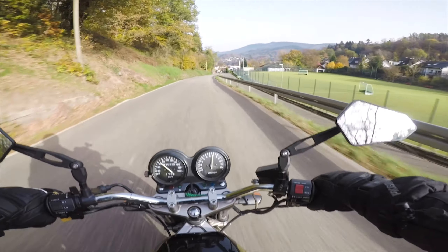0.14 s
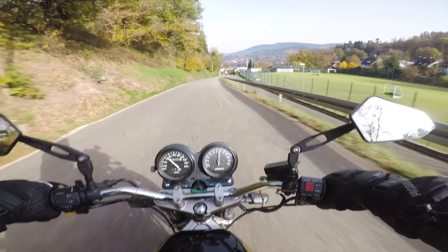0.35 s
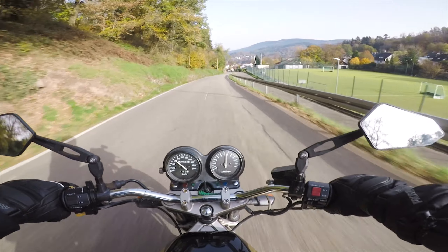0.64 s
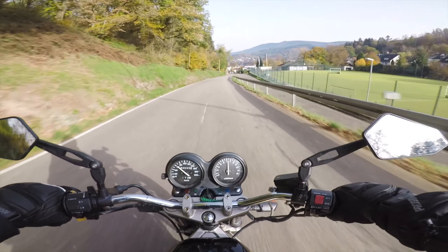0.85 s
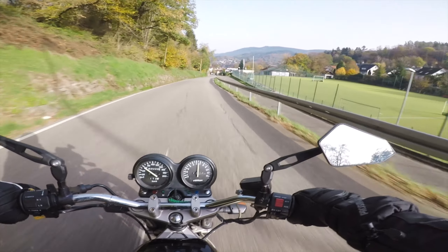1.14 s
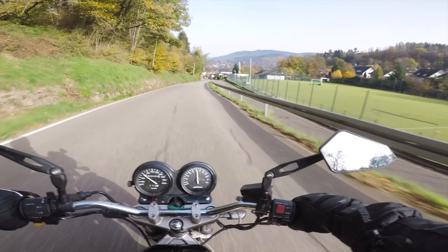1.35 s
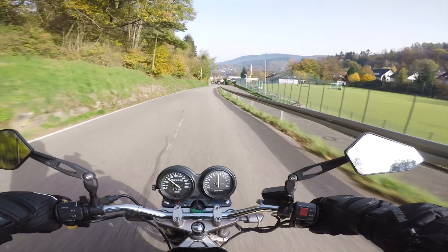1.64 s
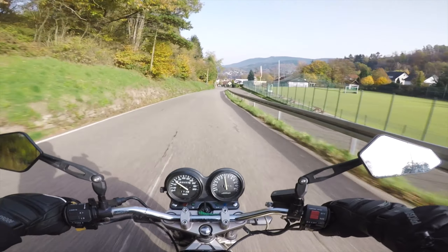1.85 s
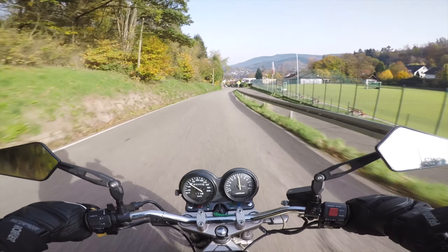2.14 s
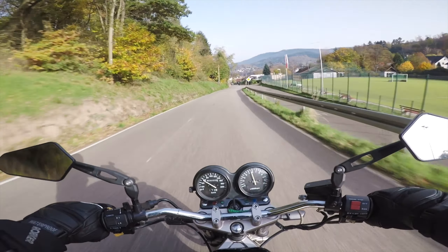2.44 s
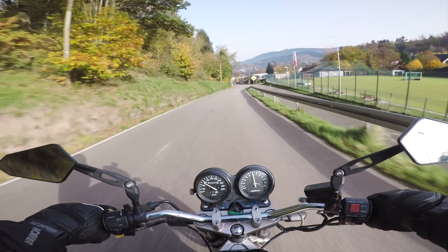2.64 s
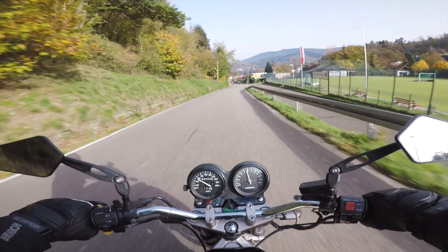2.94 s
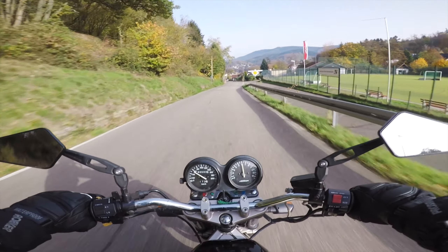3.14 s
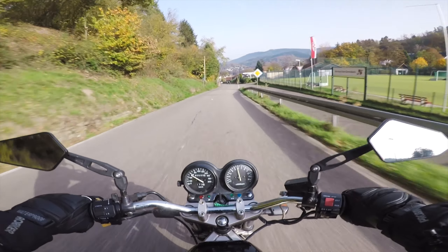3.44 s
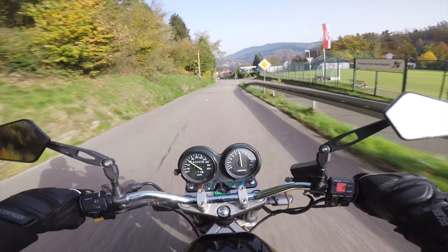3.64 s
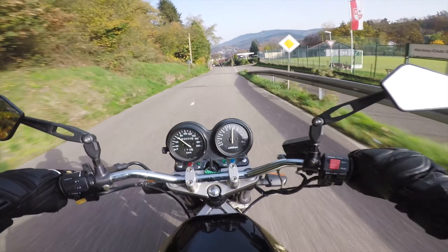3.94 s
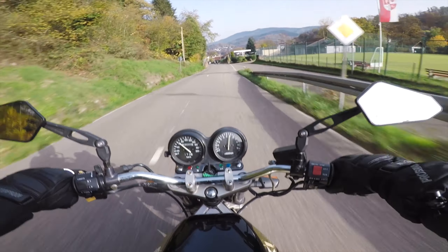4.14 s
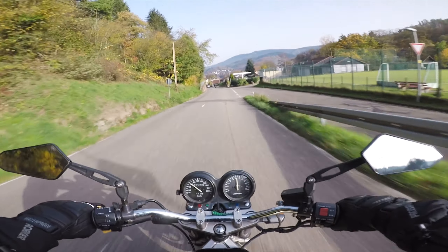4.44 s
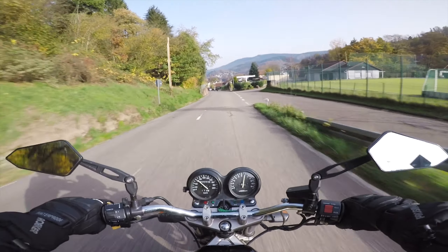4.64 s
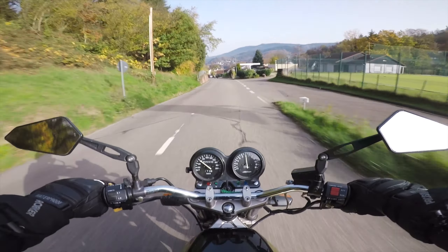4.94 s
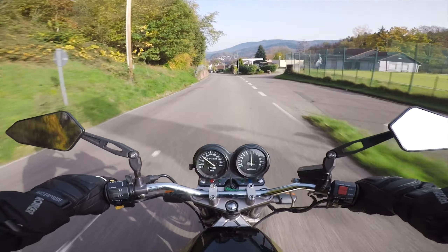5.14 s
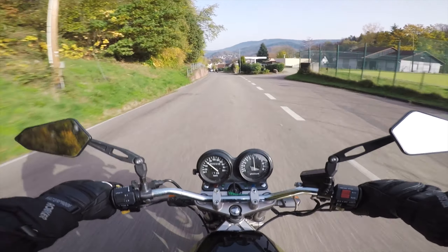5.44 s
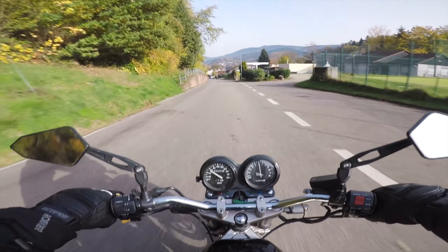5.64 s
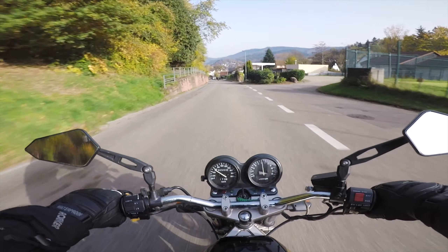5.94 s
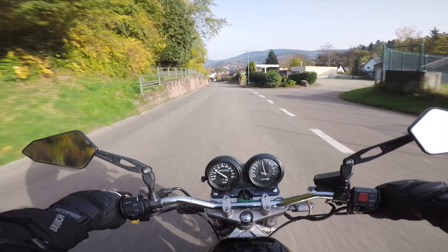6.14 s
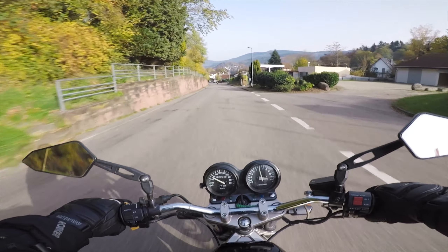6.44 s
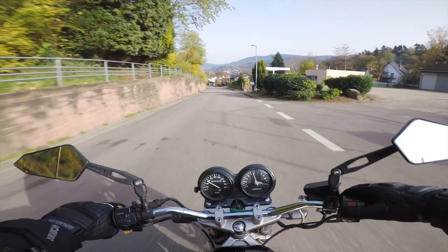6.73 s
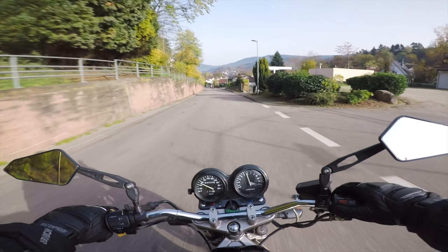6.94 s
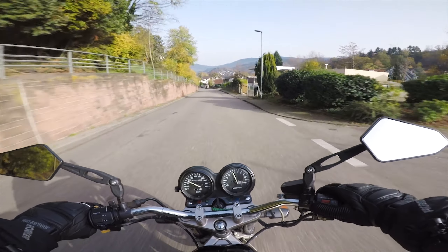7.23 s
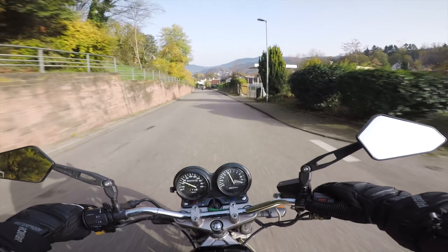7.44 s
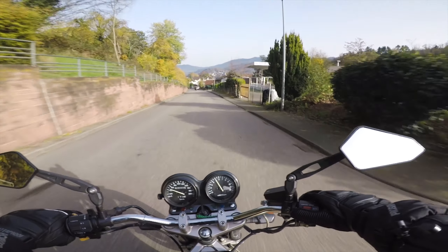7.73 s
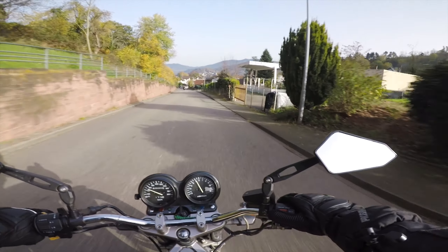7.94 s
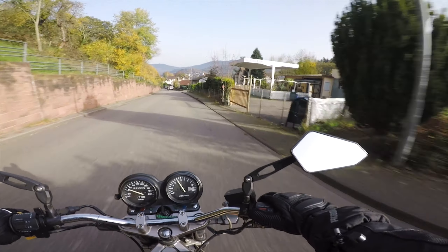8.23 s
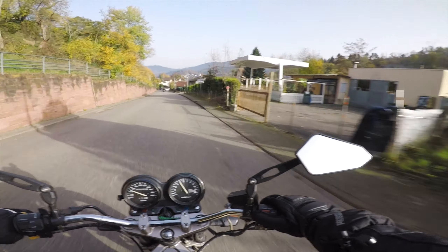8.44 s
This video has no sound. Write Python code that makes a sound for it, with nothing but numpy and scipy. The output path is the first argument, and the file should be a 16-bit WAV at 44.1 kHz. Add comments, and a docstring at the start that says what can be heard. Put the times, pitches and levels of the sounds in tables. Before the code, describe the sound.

Wind buffets a microphone at the rider's helmet as a twin-cylinder motorcycle slows on an open road. The exhaust booms and burbles, with scattered pops over light mechanical ticking and a thin whine. Midway, one short pull on the throttle raises the pitch and hardens the note into a bark. Then the engine sinks to a lower drone, with some soft thuds, and the wind eases slightly.

```python
"""Parallel-twin motorcycle exhaust, heard from the rider's helmet.
On the overrun, engine orders boom in the silencer, gas burbles and unburnt fuel pops.
The throttle opens once, the firings bark, then the engine slows again.
Valves clatter in step with the crank; upper orders whine through a resonance.
Wind rumbles and hisses round the helmet; a brake rubs faintly at the end."""
import sys
import numpy as np
from scipy import signal
from scipy.fft import rfft, irfft, next_fast_len
from scipy.io import wavfile
from scipy.ndimage import uniform_filter1d, minimum_filter1d, map_coordinates

SR = 44100
rng = np.random.default_rng(int(sys.argv[2]) if len(sys.argv) > 2 else 0)


def bounce(signal):
    """Save signal as a 16-bit WAV file at the path given by the first command-line argument."""
    frames = np.transpose(np.atleast_2d(signal))
    limited = np.clip(frames, -1, 1)
    pcm = np.round(limited * 32767).astype(np.int16)
    wavfile.write(sys.argv[1], SR, pcm)


N = 377937
CRUISE_HZ = 46  # reference cycle rate

# Four-stroke cycle rate: t/s, f/Hz
CYCLE_RATE = [(0, 53.22), (.25, 52.4), (.7, 50.3), (1.1, 49.82), (1.5, 47.88), (2.2, 45.76), (2.97, 44.03),
              (3.14, 47.8), (3.22, 45.15), (3.6, 47.03), (3.8, 50.87), (4.13, 52.76), (4.26, 48.3),
              (4.39, 50.45), (4.95, 48.7), (6.4, 44.23), (7.7, 40.67), (8.57, 38.67)]
# Throttle: t/s, opening/0-1
THROTTLE_OPENING = [(2.95, 0.02), (3.15, 0.25), (3.24, .1), (3.5, 0.36), (3.64, 0.44), (3.78, .95),
                    (3.97, 0.94), (4.13, 0.42), (4.17, 0.02)]
# Silencer boom by cycle rate: f/Hz, order 3 level/dB, order 4 level/dB, order 5 level/dB
SILENCER_BOOM = [(38.6, -8, -12, -28.5), (41.6, -14.5, -13.5, -29), (44, -14, -13.5, -24.5),
                 (47.55, -14, -11, -19), (49.5, -15, -13, -16), (51.4, -15, -22, -15),
                 (53.4, -20.5, -32.5, -14.5)]
# Other exhaust orders, throttle shut: f/Hz, level/dB
OVERRUN_HUM = [(38, -40.5), (49, -24), (78, -25.5), (100, -19.5), (235, -35.5), (278, -23), (310, -29),
               (350, -31), (400, -40.5), (520, -46.5), (600, -44), (665, -42.5), (740, -48.5), (850, -56)]
# Drone change with throttle open: f/Hz, gain/dB
PULL_EQ = [(50, 5.5), (92, -8.5), (137, -7), (180, -0.5), (195, 0), (228, -9.5), (275, -4.5), (320, 4.5),
           (370, -3.5), (460, 2.5), (520, 5), (730, 0.5)]
# One firing under load: f/Hz, level/dB
FIRING_SPECTRUM = [(30, -30), (50, -37), (110, -17.5), (205, 9), (260, 3), (310, -3), (360, 4), (420, 7),
                   (540, -5.5), (690, -4), (850, -12.5), (1020, -20), (1140, -14), (1300, -23),
                   (2000, -42.5), (3500, -56), (8000, -93.5)]
# Blow-down gas: f/Hz, level/dB
BLOW_DOWN_SPECTRUM = [(200, -14), (600, 2), (1300, -11), (2800, -17), (6000, -29.5), (10000, -54.5)]
# Exhaust gas, throttle shut: f/Hz, level/dB
BURBLE_SPECTRUM = [(40, -14.5), (85, 7), (170, 3.5), (300, -2), (480, -8), (700, -11.5), (950, -23),
                   (1800, -28.5), (4000, -65.5)]
# Afterfire pops: t/s, strength/dB
AFTERFIRE_POPS = [(0.254, -41), (0.563, -19), (0.607, -12), (0.785, -12.5), (0.821, -33), (0.982, -20.5),
                  (1.006, -32.5), (1.148, -7.5), (1.288, -36), (1.793, -17), (2.159, -18.5), (2.356, -18),
                  (2.484, -26.5), (2.668, -12.5), (2.685, -34), (2.799, -34.5), (2.915, -40), (4.155, -36),
                  (6.238, -47.5), (6.440, -25.5), (6.974, -28), (7.208, -33.5), (7.451, -25), (7.791, -42),
                  (8.174, -40.5), (8.324, -39), (8.507, -28)]
# Silencer resonances: f/Hz, width/Hz, level/dB
SILENCER_MODES = [(117, 29, 1), (282, 64, 1.5), (366, 86, -3.5), (646, 160, -11)]
# Crack of a pop: f/Hz, level/dB
CRACK_SPECTRUM = [(150, -18), (450, -6), (900, -0.5), (1500, 1.5), (3000, -9), (4200, -36.5), (9000, -49)]
# Valve contacts: phase/cycles, strength/ratio
VALVE_CONTACTS = [(0.122, 0.63), (.31, 0.83), (0.457, .6), (0.661, 0.52), (0.907, 0.66)]
# Pipe standing waves: f/Hz, width/Hz, level/dB
PIPE_MODES = [(740, 54, -3.5), (1113, 110, 4.5), (1380, 150, -2), (1700, 74, 0), (2322, 200, -6),
              (2870, 640, -10.5)]
# Orders driving the whine: f/cycle rate, level/dB
WHINE_DRIVE = [(11, -3), (12, 0)]
# Whine harmonics: f/fundamental, level/dB
WHINE_HARMONICS = [(1, 1), (2, -24.5), (3, -18.5), (4, -22.5), (5, -34)]
# Wind buffeting: f/Hz, level/dB
RUMBLE_SPECTRUM = [(15, -18.5), (35, -4), (60, 4.5), (120, -6), (300, -6), (480, -11), (700, -16),
                   (950, -22.5), (2000, -27), (4000, -69.5)]
# Air past the helmet's edges: f/Hz, level/dB
HISS_SPECTRUM = [(1000, -19.5), (2600, -2), (3400, -3), (4000, 1), (4700, 3.5), (5600, -4), (7000, -15),
                 (10000, -52)]
# Finest wind hiss: f/Hz, level/dB
FIZZ_SPECTRUM = [(4000, -22.5), (5600, -2.5), (6350, 0), (7000, -4), (8200, -9), (9300, -17.5),
                 (10500, -38.5), (12000, -70), (13000, -90)]
# Finest wind hiss over time: t/s, level/dB
FIZZ_ENVELOPE = [(0, -59.5), (2.5, -58), (3.6, -55), (4.0, -62.5), (4.6, -59.5), (6.0, -60), (6.45, -68),
                 (6.85, -59), (8.57, -61)]


def drone(cycle_hz, cycles, throttle, lag_rad=.51, smear_rad=.8, bright_db_per_hz=1.03):
    """Low engine orders: 3-5 boom in the silencer, the rest hum through the pipe."""
    rates_hz, *boom_columns = np.transpose(SILENCER_BOOM)
    boom_db = {k: np.interp(cycle_hz, rates_hz, db) for k, db in enumerate(boom_columns, 3)}
    pull = np.tanh(10 * throttle)

    def order(k):
        hz = k * cycle_hz
        if k in boom_db:
            db = boom_db[k] + .87 * wobble(12)
        else:  # faster running sharpens the puffs
            lift_db = bright_db_per_hz * (cycle_hz - CRUISE_HZ) * np.clip(np.log(hz / 260), 0, .4)
            db = along(OVERRUN_HUM, hz) + lift_db + 1.23 * wobble(9.3)
        # the pipe smears each puff over the cycle
        phase_rad = 2 * np.pi * k * cycles - lag_rad + smear_rad * (k - 4) ** 2
        return amp(db + pull * along(PULL_EQ, hz)) * np.cos(phase_rad)

    return order(1) + (1 - throttle ** 3) * sum(order(k) for k in range(2, 17))


def bark(cycles, throttle, firing_db=-16.5, gas_db=-38, far_gain=.43, far_cutoff_hz=900):
    """Under load: two firings about a quarter cycle apart, the far one duller, plus blow-down hiss."""
    near = each_cycle(cycles, 0, scatter_db=.4, jitter_s=2e-5)
    far = each_cycle(cycles, .228, scatter_db=.7, jitter_s=5e-5)
    firings = near + far_gain * filtered(far, lambda hz: 1 / (1 + (hz / far_cutoff_hz) ** 2))
    gate = np.exp(-(cycles % 1) / .46)
    gas = unit(coloured(gate * rng.standard_normal(N), BLOW_DOWN_SPECTRUM))
    blow_down = throttle * amp(gas_db) * gas
    return throttle ** 1.08 * amp(firing_db) * unit(coloured(firings, FIRING_SPECTRUM)) + blow_down


def burble(cycles, throttle, effort_db, base_db=-29, onset_cycles=.7, decay_cycles=.47):
    """Throttle shut: one ragged gas puff leaves the pipe per cycle."""
    gate = np.exp(-((cycles - onset_cycles) % 1) / decay_cycles)
    gas = unit(coloured(gate * rng.standard_normal(N), BURBLE_SPECTRUM))
    return gas * np.exp(-10 * throttle) * amp(base_db + .5 * effort_db + 2.3 * wobble(7))


def afterfire(thump_gain_db=42, crack_gain_db=17, echo_gain=.44, echo_s=.00738, flare_s=.0045):
    """Unburnt fuel ignites in the pipe: crack, short flare, thump echoed by the silencer's end."""
    times_s, strength_db = np.transpose(AFTERFIRE_POPS)
    push = amp(.33 * strength_db + thump_gain_db)  # weak pops thud, strong ones crack
    blows = pulses(times_s, push) + echo_gain * pulses(times_s + echo_s, push)
    thumps = filtered(resonate(blows, SILENCER_MODES), lambda hz: 1 / (1 + 1j * hz / 700) ** 2)
    cracks = pulses(times_s, amp(strength_db + crack_gain_db))
    flare_envelope = signal.lfilter([1], [1, -np.exp(-1 / (flare_s * SR))], cracks)
    flare = .1 * flare_envelope * rng.standard_normal(N)
    return thumps + coloured(cracks + flare, CRACK_SPECTRUM)


def clatter(cycles, throttle, effort_db, base_db=-43.5, load_db=1.5, gas_mix_db=-7, cutoff_hz=3200):
    """Valve contacts and pulsing gas ring the pipe's upper modes."""
    ticks = sum(strength * each_cycle(cycles, phase_cycles, scatter_db=1.6, jitter_s=2e-5)
                for phase_cycles, strength in VALVE_CONTACTS)
    gas = (1 + .53 * np.cos(2 * np.pi * cycles)) * rng.standard_normal(N)
    ring = resonate(unit(ticks) + amp(gas_mix_db) * unit(gas), PIPE_MODES)
    ring = filtered(ring, lambda hz: 1 / (1 + (hz / cutoff_hz) ** 8))
    return amp(base_db + effort_db + load_db * throttle) * unit(ring)


def whine(cycle_hz, cycles, throttle, centre_hz=573, width_hz=22.4, base_db=-43.5, boost_db=16):
    """Upper orders sing as engine speed carries them through a resonance; quieter under load."""
    out = np.zeros(N)
    for order, order_db in WHINE_DRIVE:
        resonance = np.exp(-.5 * ((order * cycle_hz - centre_hz) / width_hz) ** 2)
        tone = sum(amp(db) * np.sin(2 * np.pi * k * order * cycles) for k, db in WHINE_HARMONICS)
        level_db = base_db + order_db + boost_db * resonance - 12 * throttle + wobble(11)
        out += amp(level_db) * tone
    return out


def wind(effort_db, rumble_db=-28.5, hiss_db=-54):
    """Air buffets the helmet and hisses past its edges, rougher at speed."""
    def air(spectrum):
        return unit(coloured(rng.standard_normal(N), spectrum))

    fizz_db = curve(FIZZ_ENVELOPE)
    pace_db = .68 * effort_db
    swell_db = .35 * (fizz_db - fizz_db.mean())
    rumble = air(RUMBLE_SPECTRUM) * amp(rumble_db + pace_db + wobble(3.7) + 1.4 * wobble(22))
    hiss = air(HISS_SPECTRUM) * amp(hiss_db + .5 * pace_db + swell_db + .61 * wobble(14))
    return rumble + hiss + air(FIZZ_SPECTRUM) * amp(fizz_db)


def brake(start_s=7.8, rise_s=.5, level_db=-73, centre_hz=13200, width_hz=1400):
    """Pad rubs on disc: thin, faint hiss."""
    rub = filtered(rng.standard_normal(N), lambda hz: np.exp(-((hz - centre_hz) / width_hz) ** 2))
    pressure = np.clip((np.arange(N) / SR - start_s) / rise_s, 0, 1)
    return amp(level_db) * pressure * unit(rub)


def amp(db):
    """dB to gain."""
    return 10 ** (np.asarray(db) / 20)


def unit(x):
    """Scale to rms 1."""
    return x / np.sqrt(np.mean(x ** 2) + 1e-20)


def along(spectrum, hz):
    """Level/dB at hz, interpolated on a log axis."""
    points_hz, db = np.transpose(spectrum)
    return np.interp(np.log(hz + 1), np.log(points_hz + 1), db)


def curve(points):
    """(t/s, value) points to one value per sample."""
    return np.interp(np.arange(N) / SR, *np.transpose(points))


def wobble(rate_hz):
    """Smooth random curve, knots at rate_hz."""
    knots = rng.standard_normal(2048)
    grid = np.arange(0, N, 32)
    spline = map_coordinates(knots, [grid * rate_hz / SR], mode="wrap")
    return np.interp(np.arange(N), grid, spline)


def filtered(x, response):
    """Apply a complex frequency response."""
    size = next_fast_len(N + SR // 2)
    return irfft(rfft(x, size) * response(np.fft.rfftfreq(size, 1 / SR)), size)[:N]


def coloured(x, spectrum, taps=8192):
    """Apply the minimum-phase filter with this spectrum."""
    gain = amp(along(spectrum, np.fft.rfftfreq(taps, 1 / SR)))
    cepstrum = irfft(np.log(gain))
    cepstrum[1:taps // 2] *= 2
    cepstrum[taps // 2 + 1:] = 0
    return signal.fftconvolve(x, irfft(np.exp(rfft(cepstrum))))[:N]


def resonate(x, modes):
    """Parallel resonances of alternating sign."""
    def response(hz):
        return sum((-1) ** k * amp(db) * 1j * hz * width_hz / (mode_hz**2 - hz**2 + 1j * hz * width_hz)
                   for k, (mode_hz, width_hz, db) in enumerate(modes))

    return filtered(x, response)


def pulses(times_s, sizes):
    """Impulses, each split between adjacent samples."""
    index, fraction = np.divmod(np.clip(times_s * SR, 0, N - 2), 1)
    index = index.astype(int)
    return np.bincount(index, sizes * (1 - fraction), N) + np.bincount(index + 1, sizes * fraction, N)


def each_cycle(cycles, phase_cycles, scatter_db, jitter_s):
    """One pulse per cycle, uneven in size and time."""
    times_s = np.interp(np.arange(int(cycles[-1])) + phase_cycles, cycles, np.arange(N) / SR)
    time_noise, size_noise = rng.standard_normal((len(times_s), 2)).T
    return pulses(times_s + jitter_s * time_noise, amp(scatter_db * size_noise))


def scene():
    """Mono mix of exhaust, machine and wind."""
    cycle_hz = curve(CYCLE_RATE)
    throttle = curve(THROTTLE_OPENING)
    effort_db = .67 * (cycle_hz - CRUISE_HZ)
    cycles = np.cumsum(cycle_hz * (1 + .001 * wobble(25))) / SR
    exhaust = drone(cycle_hz, cycles, throttle) + bark(cycles, throttle)
    exhaust += burble(cycles, throttle, effort_db) + afterfire()
    machine = whine(cycle_hz, cycles, throttle) + clatter(cycles, throttle, effort_db) + brake()
    return (exhaust + machine + wind(effort_db))[None]


def record(dry, ceiling=.72, hold_s=.008, cutoff_hz=15200):
    """Fast peak limiter, then brick-wall low-pass."""
    window = int(hold_s * SR)
    needed_gain = np.minimum(1, ceiling / (np.abs(dry[0]) + 1e-9))
    gain = uniform_filter1d(minimum_filter1d(needed_gain, window), window)
    return filtered(dry[0] * gain, lambda hz: hz < cutoff_hz)[None]


dry = scene()
out = record(dry)
bounce(out)
```